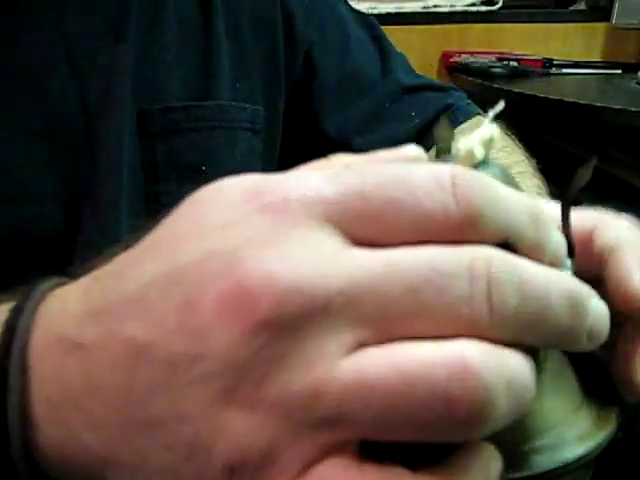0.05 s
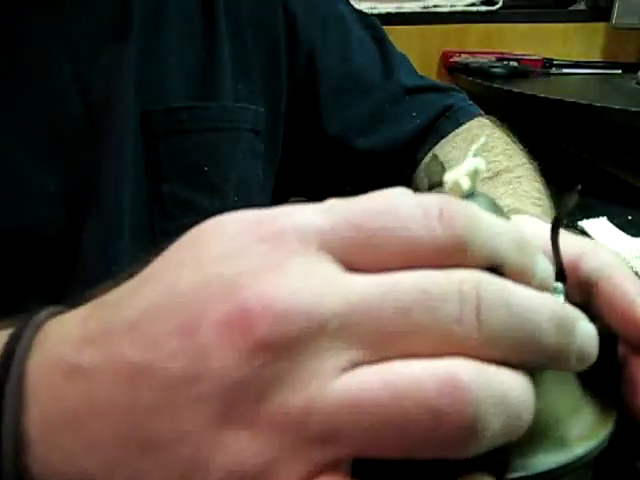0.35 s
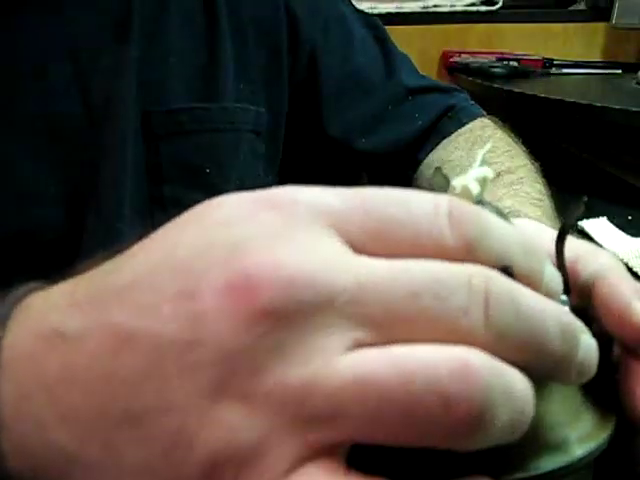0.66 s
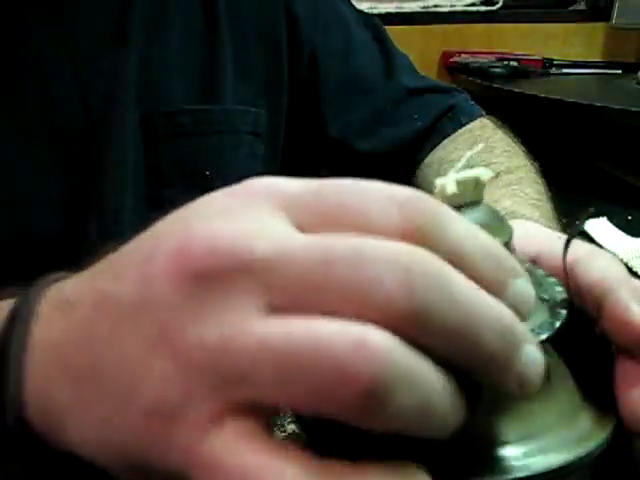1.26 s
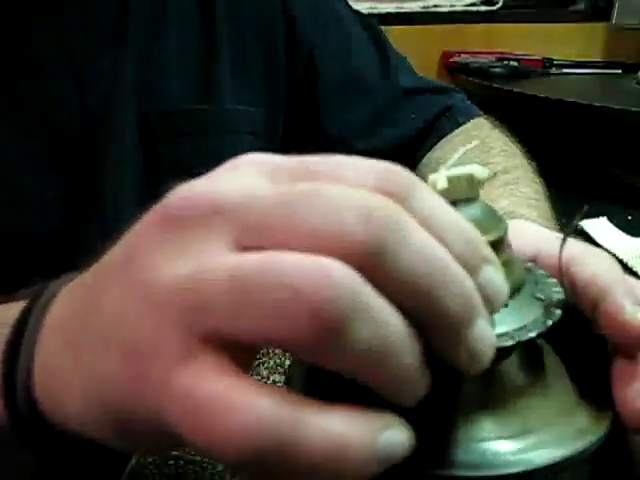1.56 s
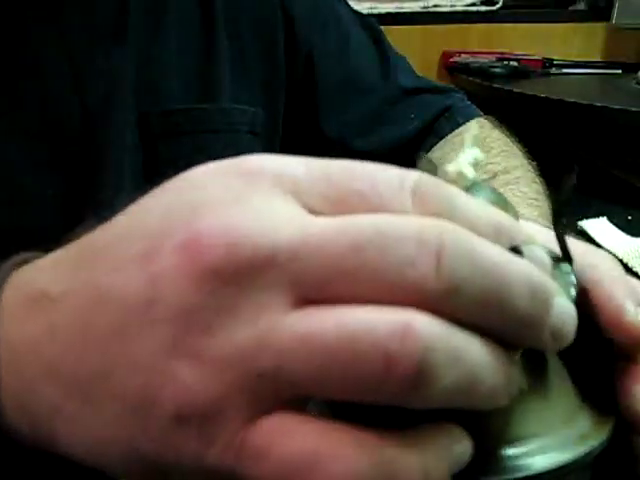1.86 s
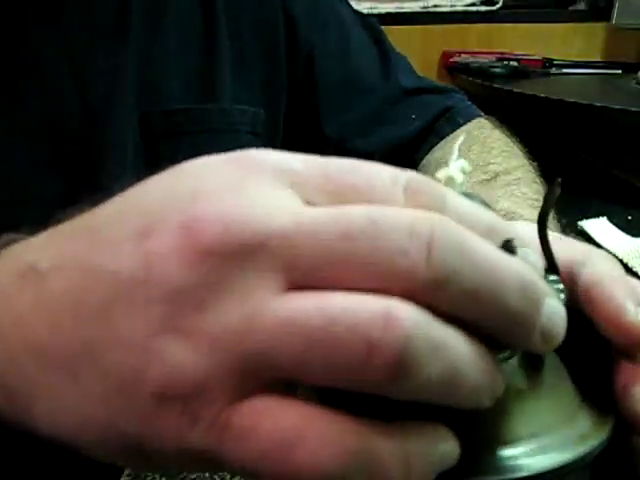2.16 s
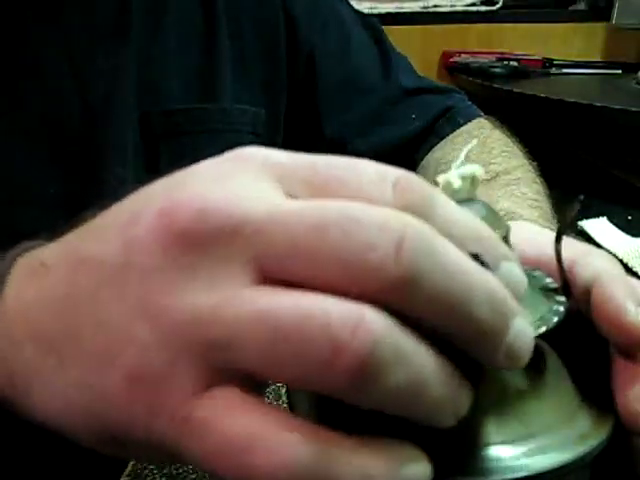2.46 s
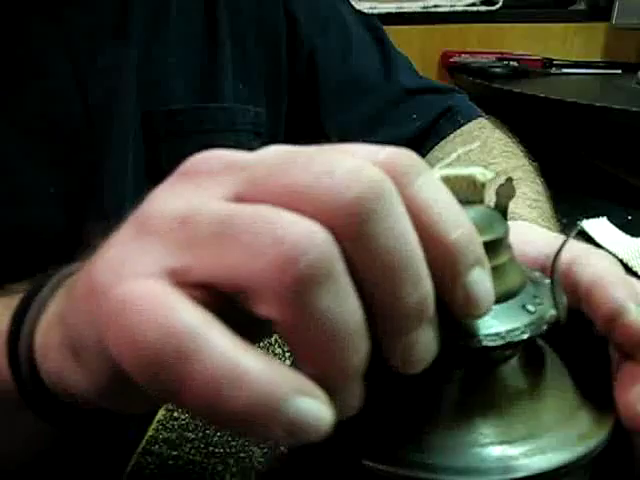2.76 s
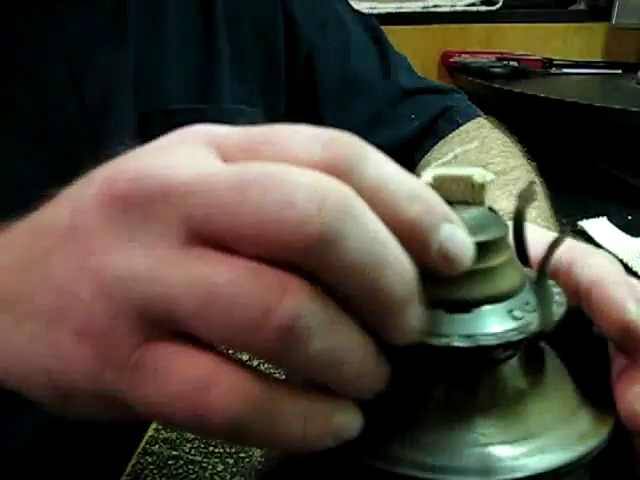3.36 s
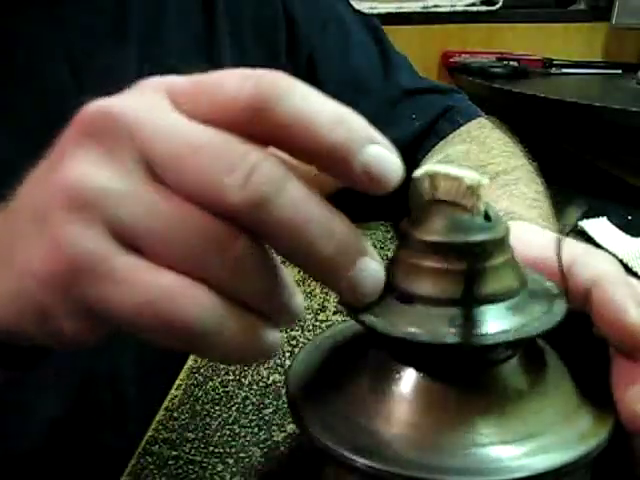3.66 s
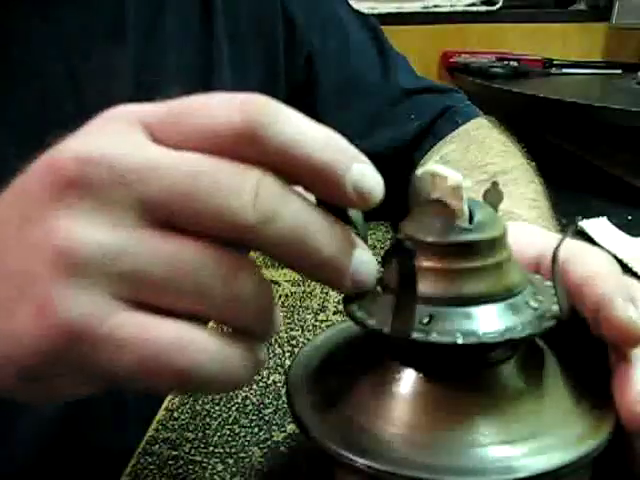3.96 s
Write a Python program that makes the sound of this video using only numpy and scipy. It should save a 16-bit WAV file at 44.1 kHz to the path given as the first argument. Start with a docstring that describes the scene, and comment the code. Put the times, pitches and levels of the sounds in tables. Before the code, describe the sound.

An oil lamp's metal burner knocks and clicks irregularly under fingers while a fan hums.

```python
"""Working an oil lamp's wick

Fingers work a wick through the metal burner of an oil lamp on a workbench. Skin slides, metal scrapes on
metal, the hollow burner knocks, its collar clinks and the lamp's foot thumps the bench. A fan and mains
hum fill the small room. An automatic gain control ducks everything at each loud click, then lets the
room swell back."""
import sys
import numpy as np
from scipy import signal
from scipy.fft import rfft, irfft, next_fast_len
from scipy.io import wavfile
from scipy.ndimage import minimum_filter1d, map_coordinates

SR = 44100
rng = np.random.default_rng(int(sys.argv[2]) if len(sys.argv) > 2 else 0)


def dump_mix(stems):
    """Bounce the given channels to the path in sys.argv[1] as a 16-bit WAV at rate SR."""
    frames = np.atleast_2d(stems).T  # one column per channel
    limited = np.clip(frames, -1, 1)  # hard clip at full scale
    pcm = np.round(limited * 32767).astype(np.int16)
    wavfile.write(sys.argv[1], SR, pcm)


N = 176400

# colour of the fan's air noise (frequency [Hz], level [dB])
AIR_SPECTRUM = [(20, -29), (50, -5.5), (85, -5.5), (125, -0.5), (200, -3.5), (255, 2), (340, 6.5),
                (470, -0.5), (720, -2), (1000, -3.5), (1200, -11), (1700, -3), (2400, -14), (3500, -15),
                (5000, -19), (6200, -31.5), (7000, -29)]
# mains hum, fan tones and a whine (frequency [Hz], rms level [dB], unsteadiness [0-1])
HUM_TONES = [(50.6, -38, 0), (118.3, -47.5, 0.3), (137.6, -51, 0.2), (170, -53, 0.89), (249.6, -41.5, 0),
             (309.6, -49.5, 0.4), (353.3, -35, 0), (423.4, -54, 0.97), (698, -54, 0), (1087, -66, 0.4),
             (1370, -50, 0.8), (4276, -49, 0)]
# envelope of the fingers sliding over the metal (time [s], level [dB])
SLIDE_ENVELOPE = [(0, -52), (.3, -41), (.7, -45.5), (.9, -41.5), (1.301, -40.5), (1.601, -49),
                  (2.001, -44.5), (2.499, -40), (2.8, -42.5), (3.4, -41), (4, -44.5)]
# colour of skin on metal (frequency [Hz], level [dB])
SKIN_SPECTRUM = [(200, -5), (800, 3.5), (2200, -1), (4500, -10), (6500, -35)]
# dull finger bumps on the lamp (time [s], peak level [dB], pitch [Hz])
FINGER_BUMPS = [(1.6413, -16.5, 620), (1.6493, -11.5, 330), (1.6701, -32, 229), (1.6792, -29, 208),
                (1.72, -18.5, 295), (2.1951, -14, 286), (3.1697, -23.5, 300)]
# metal rubbing on metal (time [s], length [s], level [dB], centre [Hz], width [octaves])
METAL_SCRAPES = [(0.016, 0.31, -49, 5230, 0.13), (.487, 0.029, -22.5, 3270, 0.67),
                 (1.238, 0.074, -44.5, 2960, 0.24), (1.455, 0.033, -45, 3260, 0.37),
                 (1.795, 0.038, -44.5, 5340, 0.1), (1.714, .06, -38, 3800, .5), (1.71, .034, -32, 750, .8),
                 (1.746, .026, -33, 1500, .6), (2.08, .035, -33, 750, .3), (2.162, .036, -27, 900, .6),
                 (3.521, .034, -35, 3150, .25), (2.075, 0.031, -37.5, 1400, 1.1),
                 (2.158, 0.056, -33, 2200, 0.92), (2.355, 0.015, -30.5, 5000, 0.62),
                 (2.953, 0.062, -44, 4810, 0.18), (2.656, 0.038, -46, 3030, 0.22),
                 (3.14, 0.031, -31, 2890, 0.6), (3.68, 0.052, -32, 2900, 0.45),
                 (3.741, 0.025, -32.5, 3200, 0.86), (3.76, 0.036, -36.5, 2700, 0.7)]
# knocks of the burner (time [s], body level [dB], body pitch [Hz], click level [dB], strike focus [Hz])
BURNER_KNOCKS = [(0.2192, -1.5, 790, -6.5, 4780), (0.4905, 3.5, 786, -4.5, 4850),
                 (.3685, -14, 830, -23, 2880), (.3705, -15, 540, -34, 1470), (.478, -14, 720, -32, 1470),
                 (1.9099, -3, 690, -13, 2780), (2.006, -18, 780, -35, 1470), (2.042, -18.5, 700, -38, 1470),
                 (2.091, -21, 780, -35, 1470), (2.113, -23, 580, -40, 1470),
                 (2.1556, -11.5, 660, -26, 4260), (2.161, -18, 560, -32, 1470),
                 (2.166, -15, 860, -18, 1470), (2.18, -14, 800, -23, 1470), (2.2028, -9, 930, -16, 1470),
                 (2.3622, -7, 920, -14, 1425), (2.3662, -8, 800, -17, 5300),
                 (3.169, -19.5, 704, -15.5, 1520), (3.692, -15.5, 690, -15, 2600),
                 (3.7062, -19, 795, -22, 1430), (3.753, -12, 737, -10, 5500)]
# the burner's hollow body (frequency [multiple of body pitch], level [dB], t60 [s])
BODY_MODES = [(.76, -14.5, 0.018), (1, -0.5, 0.013), (1.15, -1, 0.0032), (1.4, -6.5, 0.0074)]
# the burner's thin metal parts (frequency [Hz], level [dB], t60 [s])
THIN_MODES = [(1340, -14.5, 0.01), (1425, -0.5, 0.029), (2580, -17.5, 0.0072), (2843, 0, 0.017),
              (2960, -16, .018), (3860, -2.5, 0.011), (4844, -7.5, 0.018), (5100, -7, 0.021),
              (5740, -20.5, 0.0067)]
# colour of the crack where edges meet (frequency [Hz], level [dB])
CRACK_SPECTRUM = [(200, -7), (700, 5), (1800, 0.5), (3000, 6.5), (4000, 1.5), (5500, -2), (6500, -47)]
# clinks (time [s], crack level [dB], ring level [dB], strike focus [Hz], share of free ring time [0-1])
COLLAR_CLINKS = [(0.498, -4, -28, 3900, 0.13), (0.504, -6.5, -12, 2514, 0.12),
                 (1.7475, -11, -30.5, 2514, .85), (1.762, -19.5, -29, 4016, .5),
                 (2.2035, -7, -22, 2740, .39), (3.5395, -18.5, -29, 3120, .9), (1.8, -44, -39, 5432, 0.4),
                 (3.171, -12.5, -15, 3900, 0.24), (3.69, -18, -28.5, 2780, 0.38),
                 (3.7096, -15, -15, 3140, 0.21), (3.754, -13.5, -25, 2830, 0.4),
                 (3.801, -22.5, -41, 2514, 0.45)]
# the collar ringing freely (frequency [Hz], level [dB], t60 [s])
COLLAR_MODES = [(1486, -6, .09), (2514, -1, .15), (2740, -11, .05), (3120, -6, .1), (3900, -13, .05),
                (4016, -11, .09), (5432, -13, .05)]
# the lamp's foot on the bench (time [s], level [dB], starting pitch [Hz], final pitch [Hz])
FOOT_THUMPS = [(.503, -7, 370, 105), (1.647, -20, 170, 130), (1.67, -21, 170, 120), (2.204, -8.5, 360, 150),
               (2.369, -12, 330, 250), (3.558, -19, 330, 250), (3.706, -16, 380, 260),
               (3.748, -14, 380, 270), (1.499, -23, 323, 240), (2.67, -24, 347, 250),
               (3.165, -15, 340, 140)]
# colour of the bench's thud (frequency [Hz], level [dB])
THUD_SPECTRUM = [(50, -34.5), (120, 6), (280, 6), (500, 6.5), (1100, -10.5), (3000, -28)]
# the workshop's reverb time (frequency [Hz], t60 [s])
ROOM_DECAY = [(150, 0.35), (800, 0.11), (5000, 0.044)]

TIME = np.arange(N) / SR
HIT_SAMPLES = SR // 4
HIT_TIME = np.arange(HIT_SAMPLES) / SR


def amp(db):
    """Decibels to gain."""
    return 10 ** (np.asarray(db) / 20)


def unit_rms(x):
    """Scale to rms 1."""
    return x / np.sqrt(np.mean(x ** 2) + 1e-20)


def curve_at(points, hz):
    """Read a curve of (frequency, value) points along a log frequency axis."""
    point_hz, values = np.transpose(points)
    return np.interp(np.log(hz + 1), np.log(point_hz + 1), values)


def filtered(x, response):
    """Equalise x with a gain given as a function of frequency."""
    size = next_fast_len(len(x) + SR // 8)
    return irfft(rfft(x, size) * response(np.fft.rfftfreq(size, 1 / SR)), size)[:len(x)]


def coloured(x, spectrum):
    """Give x the colour of a spectrum, at rms 1."""
    return unit_rms(filtered(x, lambda hz: amp(curve_at(spectrum, hz))))


def wobble(rate):
    """A smooth random curve, rate knots a second."""
    return map_coordinates(rng.standard_normal(N // 100), [TIME * rate], mode="wrap")


def friction_ticks(size, per_s, scatter_db):
    """The grain of friction: impulses of random timing, sign and strength."""
    ticks = (rng.random(size) < per_s / SR) * rng.choice([-1, 1], size)
    return ticks * amp(scatter_db * rng.standard_normal(size))


def add(track, start_s, sound):
    """Mix a sound into the track."""
    part = track[max(0, round(start_s * SR)):][:len(sound)]
    part += sound[:len(part)]


def ring(modes, scale=1, focus_hz=0, focus_db=8, focus_octaves=0.1, scatter_db=2.5, rise_s=0.00053):
    """Struck metal's damped modes, new each hit; the spot struck favours those near focus_hz."""
    tone = np.zeros(HIT_SAMPLES)
    for k, (hz, db, t60) in enumerate(modes):
        lift_db = focus_db * np.exp(-(np.log2((focus_hz + 1) / hz) / focus_octaves) ** 2)
        envelope = amp(db + lift_db + scatter_db * rng.normal() - 60 * HIT_TIME / t60)
        tone += (-1) ** k * envelope * np.sin(2 * np.pi * hz * scale * HIT_TIME)
    return tone * (1 - np.exp(-HIT_TIME / rise_s))


def fan_and_hum(air_db=-33):
    """A bed of steady air noise with mains and fan tones, some wavering in level and phase."""
    out = amp(air_db) * coloured(rng.standard_normal(N), AIR_SPECTRUM)
    for hz, db, unsteadiness in HUM_TONES:
        sway = 1 + unsteadiness * (wobble(rate=15) + 1j * wobble(rate=16))
        out += amp(db) * unit_rms(np.real(sway * np.exp(2j * np.pi * hz * TIME)))
    return out


def fingers(pressure_db=4, bump_width_cycles=0.55):
    """Skin slides over the metal in faint grains and now and then bumps it with one soft push."""
    grains = friction_ticks(N, per_s=1100, scatter_db=0.5)
    level_db = np.interp(TIME, *np.transpose(SLIDE_ENVELOPE)) + pressure_db * wobble(rate=26)
    out = amp(level_db) * coloured(grains, SKIN_SPECTRUM)
    t = np.arange(-SR // 100, SR // 100) / SR
    for peak_s, db, hz in FINGER_BUMPS:
        push = np.exp(-0.5 * (hz * t / bump_width_cycles) ** 2)
        add(out, peak_s + t[0], amp(db) * push * np.cos(2 * np.pi * hz * t))
    return out


def scrapes(ring_db=-10):
    """Metal drags over metal in runs of tiny irregular slips, partly ringing in the collar."""
    out = np.zeros(N)
    for start_s, length_s, db, centre_hz, octaves in METAL_SCRAPES:
        slips = friction_ticks(HIT_SAMPLES, per_s=3200, scatter_db=5)
        ringing = signal.fftconvolve(slips, ring(COLLAR_MODES))[:HIT_SAMPLES]
        rub = unit_rms(slips) + amp(ring_db) * unit_rms(ringing)
        rub = filtered(rub, lambda hz: np.exp(-0.5 * (np.log2((hz + 1) / centre_hz) / octaves) ** 2))
        rub = unit_rms(rub[:int(length_s * SR)])
        add(out, start_s, amp(db) * rub * signal.windows.tukey(len(rub), 0.5))
    return out


def crack(t60=0.01):
    """The short burst of noise where two edges meet."""
    return coloured(rng.standard_normal(HIT_SAMPLES), CRACK_SPECTRUM) * amp(-60 * HIT_TIME / t60)


def burner_knocks(grip_detune=0.011, crack_db=-3.5):
    """The hand-damped body knocks under a click of thin parts, whose pitch shifts with the grip."""
    out = np.zeros(N)
    for start_s, body_db, body_hz, click_db, focus_hz in BURNER_KNOCKS:
        body = ring(BODY_MODES, scale=body_hz)
        thin_parts = ring(THIN_MODES, scale=1 + grip_detune * rng.normal(), focus_hz=focus_hz)
        click = 0.5 * thin_parts + amp(crack_db) * crack()
        add(out, start_s, amp(body_db) * body + amp(click_db) * click)
    return out


def collar_clinks():
    """A sharp contact sets the collar ringing; the fingers choke its tail."""
    out = np.zeros(N)
    for start_s, crack_db, ring_db, focus_hz, ring_share in COLLAR_CLINKS:
        held_modes = [(hz, db, t60 * ring_share) for hz, db, t60 in COLLAR_MODES]
        add(out, start_s, amp(crack_db) * crack() + amp(ring_db) * ring(held_modes, focus_hz=focus_hz))
    return out


def bench_thumps(rise_s=0.002, t60=0.11, glide_s=0.02, thud_db=-6):
    """The foot sends bending waves through the bench; low ones arrive later, so a tone falls over a thud."""
    out = np.zeros(N)
    envelope = (1 - np.exp(-HIT_TIME / rise_s)) * amp(-60 * HIT_TIME / t60)
    for start_s, db, start_hz, end_hz in FOOT_THUMPS:
        hz = end_hz + (start_hz - end_hz) * np.exp(-HIT_TIME / glide_s)
        tone = np.sin(2 * np.pi * np.cumsum(hz) / SR)
        thud = coloured(rng.standard_normal(HIT_SAMPLES), THUD_SPECTRUM)
        add(out, start_s, amp(db) * envelope * (tone + amp(thud_db) * thud))
    return out


def room_reverb(x):
    """A small workshop's short tail, its highs dying first."""
    hz, t, spectra = signal.stft(rng.standard_normal(SR // 2), SR, nperseg=256)
    decay = amp(-60 * t / curve_at(ROOM_DECAY, hz)[:, None])
    tail = signal.istft(spectra * decay, SR, nperseg=256)[1]
    response = np.pad(tail / np.linalg.norm(tail), (SR // 250, 0))  # 4 ms pre-delay
    return signal.fftconvolve(x, response)[:N]


def scene(reverb_db=-11):
    """The lamp close up with a touch of room, over the fan and hum, in mono."""
    lamp = burner_knocks() + collar_clinks() + scrapes() + bench_thumps() + fingers()
    return (lamp + amp(reverb_db) * room_reverb(lamp) + fan_and_hum())[None]


def gain_control(x, threshold_db=-18, sense_s=0.0028, hold_s=0.046, release_s=0.34):
    """Ducks at once on a loud click, holds, then lets the level swell back."""
    pole = np.exp(-1 / (sense_s * SR))
    level_db = 10 * np.log10(signal.lfilter([1 - pole], [1, -pole], x ** 2) + 1e-12)
    duck_db = np.minimum(threshold_db - level_db, 0)
    hold = int(hold_s * SR) + 1
    held_db = minimum_filter1d(duck_db, hold, origin=(hold - 1) // 2)
    release = np.exp(-TIME / release_s)
    gain_db = release * np.minimum.accumulate(held_db / release)  # eases off until a deeper duck
    return x * amp(gain_db)


def record(dry, top_hz=6550, ceiling_db=-8.5):
    """Gain control and soft clipping, with a steep high cut before and after."""
    high_cut = lambda hz: 1 / np.sqrt(1 + (hz / top_hz) ** 90)
    ducked = gain_control(filtered(dry[0], high_cut))
    clipped = ducked / (1 + (ducked / amp(ceiling_db)) ** 4) ** 0.25
    return filtered(clipped, high_cut)[None]


dry = scene()
out = record(dry)
dump_mix(out)
```